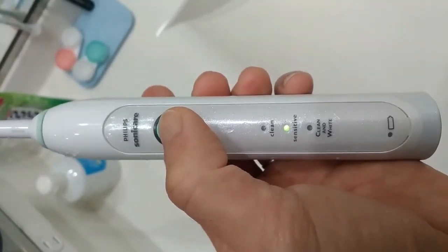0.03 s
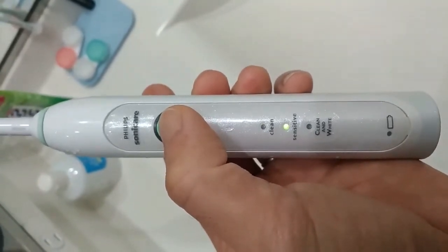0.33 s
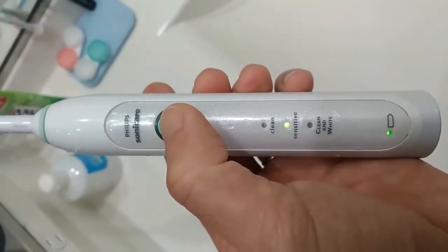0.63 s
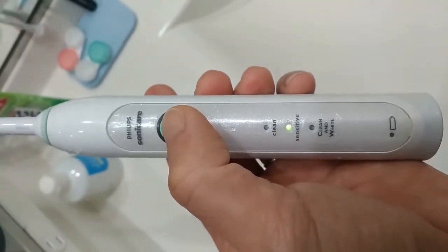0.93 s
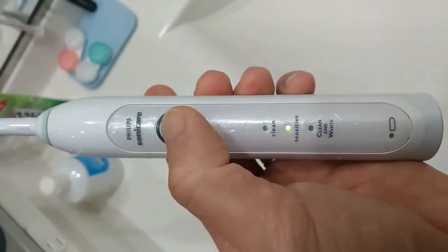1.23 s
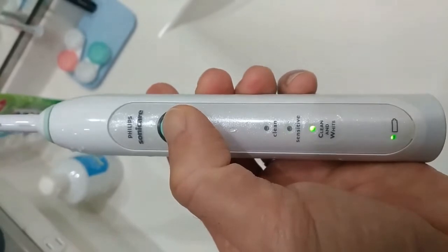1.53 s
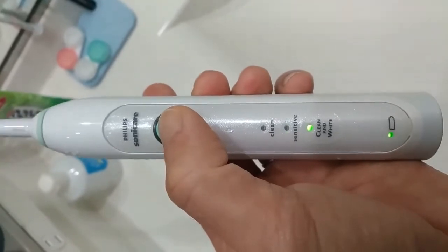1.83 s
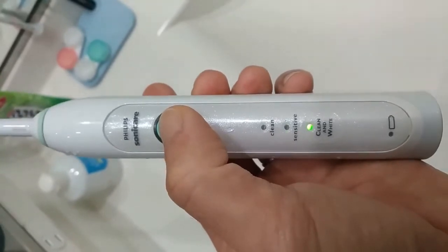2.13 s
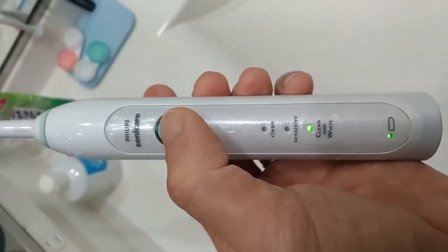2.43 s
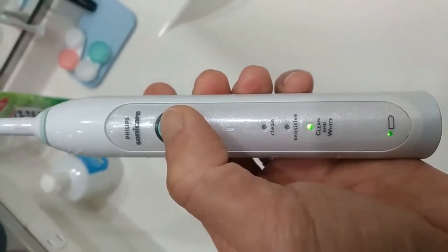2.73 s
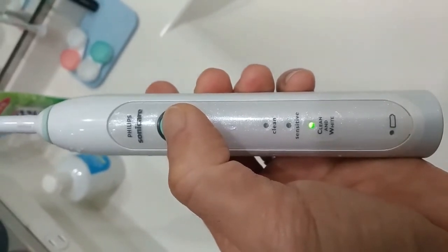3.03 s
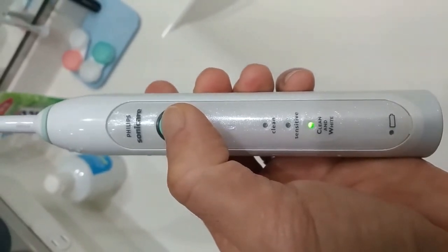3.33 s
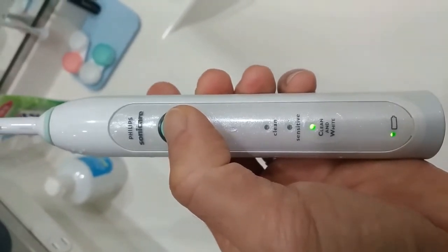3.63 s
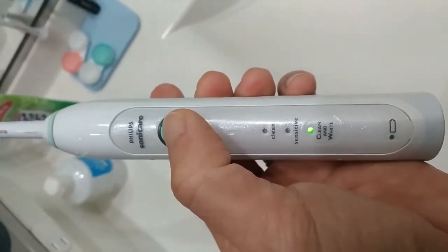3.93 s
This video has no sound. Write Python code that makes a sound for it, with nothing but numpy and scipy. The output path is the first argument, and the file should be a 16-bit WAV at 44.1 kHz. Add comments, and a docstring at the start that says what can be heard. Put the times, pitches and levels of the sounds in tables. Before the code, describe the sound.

An electric toothbrush buzzes steadily close to the microphone in a small bathroom. A button clicks and the buzz warbles and rattles for a second, then settles into a steady hum and stops with a clack.

```python
"""A sonic toothbrush held close to a stereo microphone in a small tiled bathroom, over faint room tone.
It starts on the gentle setting, the vibrating shaft humming over a hiss of friction. At 1.4 s a thumb
presses the button; the drive then flips between two pitches 20 times a second, and the loose shaft
chatters and knocks the plastic housing at the upward flips. At 2.5 s it settles on the full setting.
At 3.8 s the switch ticks and the drive stops with a clack."""
import sys
import numpy as np
from scipy import signal
from scipy.fft import rfft, irfft, next_fast_len
from scipy.io import wavfile
from scipy.ndimage import map_coordinates

SR = 44100
rng = np.random.default_rng(int(sys.argv[2]) if len(sys.argv) > 2 else 0)


def persist_wave(psi):
    """Save psi, clipped to +-1, as 16-bit WAV."""
    counts = np.round(np.clip(psi, -1, 1) * 32767).astype(np.int16)
    wavfile.write(sys.argv[1], SR, np.atleast_2d(counts).T)


N = 176400

PRESS_S, WARBLE_S, RATTLE_S, FULL_S, STOP_S = 1.419, 1.5215, 1.5742, 2.529, 3.816
GENTLE_HZ, HIGH_HZ, FULL_HZ, TOP_HZ = 253.27, 262.6, 257.69, 15800
FLIPS_PER_S, HIGH_SHARE = 19.9, 0.47  # upward flips; share of each period spent at the high pitch
SETTLE_S, RELEASE_S = 0.0033, 0.0026  # time constants: a change of setting, the hum's decay
DRIFT_HZ, WAVER_DB, WAVER_DB_PER_KHZ = 0.093, 0.33, 0.0517  # slow unsteadiness in the hand
SHIMMER_HZ, SHIMMER_PER_S, SHIMMER_DB, SHIMMER_RAD = 2620, 28, 1.42, 0.15  # the treble flickers
SCATTER_RAD, UNEVEN_DB, HIGH_LIFT_DB = 1.62, 2, 3  # spread among overtones; the high pitch is brighter
RASP_DB, RASP_SWELL_DB, RASP_LAG_S, RASP_PULSE = -55.5, 5.5, 0.013, 0.46
KNOCK_ATTACK_S, CRACK_T60_S, CRACK_DB, RING_DB = 0.00067, 0.0094, 5, -4.5
ROOM_TONE_DB, HISS_DB, PRESS_DB, RATTLE_DB = -60, -61, -40, -44.5
KNOCK_ROOM_DB, WARBLE_ROOM_DB = -7, -16  # the room's tail against the direct sound

# Room tone at the microphone: frequency_hz, relative_db
ROOM_TONE_SPECTRUM = [(20, -40), (31, -26), (42, -2.5), (85, -3.5), (110, -9.5), (165, -7.5), (230, -13),
                      (450, -17.5), (950, -8.5), (1500, -17.5), (2300, -27.5), (5000, -31), (9000, -32),
                      (15000, -39)]
# Likeness of noise in the left and right channels: frequency_hz, correlation
STEREO_LIKENESS = [(60, 0.79), (300, 0.62), (1000, 0.059), (3000, 0.31), (10000, 0.38)]
# Decay of the tiled room: frequency_hz, t60_s
ROOM_DECAY = [(200, 0.4), (1000, 0.26), (3000, 0.28), (12000, 0.14)]
# Ticks of the switch: start_s, level_db
SWITCH_TICKS = [(1.503, -45), (3.804, -43)]
# Colour of a tick: frequency_hz, relative_db
TICK_SPECTRUM = [(500, -59), (2500, 8), (4500, -4), (7000, -16), (10000, -12), (15000, -26)]
# Modes of the plastic housing: pitch_hz, relative_db, t60_s
HOUSING_MODES = [(332, -21, 0.39), (696, -38.5, 0.033), (771, -3.5, 0.099), (1009.6, 1, 0.056),
                 (1356, 7.5, 0.022), (1550, -6, 0.015), (1873, -5.5, 0.065), (2953, -11.5, 0.075),
                 (3957, -6, 0.023), (4970, -3, .015), (6360, -26, 0.018)]
# Crack of the shaft meeting the housing: frequency_hz, relative_db
CRACK_SPECTRUM = [(200, -29), (500, -5.5), (750, -13), (1300, -1.5), (2200, -6), (3400, -11), (4800, -13.5),
                  (6600, -10.5), (8500, -17.5), (11000, -22), (15500, -30)]
# Hard jolts, as the warble starts and as the drive stops: start_s, level_db
HARD_JOLTS = [(1.5348, -34.5), (3.8155, -29)]
# Successive knocks of one jolt: relative_db
JOLT_KNOCKS_DB = [-5, -1, -2.5, -11]
# Knocks of the final clack, which dies sooner: relative_db
CLACK_KNOCKS_DB = [0, -2.5, -9.5]
# Chatter of the loose shaft: frequency_hz, relative_db
RASP_SPECTRUM = [(300, -20), (1000, -22), (2300, 0), (3600, 0), (4400, -7), (6500, 0.5), (7700, -10),
                 (8600, -30), (10000, -13.5), (12500, -39), (15000, -31)]
# Friction of the drive: frequency_hz, relative_db
HISS_SPECTRUM = [(150, -0.5), (400, -3), (950, -1), (1600, -3.5), (2400, -13), (7000, -27), (15000, -44)]
# Overtones on the two steady settings:
# multiple, gentle_left_db, gentle_right_db, full_left_db, full_right_db, left_lead_rad
STEADY_OVERTONES = [(1, -62, -63, -68, -66, -0.8), (2, -47, -66, -47, -69, 0.9),
                    (3, -56, -62, -56, -62, 0.4), (4, -45, -46, -45, -47, 0.8),
                    (5, -57, -58, -58, -68, -0.7), (6, -53, -44, -49, -46, 2.7),
                    (7, -64, -52, -60, -51, 0.9), (8, -53, -47, -47, -46, -1.5),
                    (9, -69, -64, -58, -59, 2.8), (10, -67, -59, -62, -55, -2.2),
                    (11, -59, -57, -60, -56, 1.1), (12, -69, -65, -66, -66, -1.5),
                    (13, -58, -61, -55, -59, 2.4), (14, -67, -92, -75, -76, -0.9),
                    (15, -62, -74, -70, -69, 0.9), (16, -71, -67, -64, -60, 1.1),
                    (17, -79, -74, -73, -76, 1.6), (18, -75, -83, -71, -74, 1.4),
                    (19, -80, -67, -70, -65, 2.2), (20, -78, -80, -79, -80, 1.5),
                    (21, -76, -72, -66, -82, -1.4), (22, -68, -74, -72, -72, -2.3),
                    (23, -68, -74, -64, -67, -2.0), (24, -68, -68, -79, -67, -1.2),
                    (25, -82, -78, -79, -73, -1.0), (26, -80, -73, -75, -73, 0.8),
                    (27, -74, -75, -73, -77, 0.9), (28, -77, -67, -67, -67, 1.2),
                    (29, -71, -76, -80, -80, -1.9), (30, -67, -66, -70, -66, -0.8),
                    (31, -81, -77, -85, -74, 1.1), (32, -72, -69, -86, -87, 1.2),
                    (33, -79, -79, -80, -83, 1.6), (38, -83, -84, -84, -85, 1.3),
                    (41, -77, -89, -79, -87, 1.4), (43, -81, -86, -83, -86, 1.5),
                    (45, -86, -90, -85, -97, 1.8), (46, -90, -91, -73, -89, 0.9),
                    (47, -83, -92, -88, -91, 1.6), (50, -86, -91, -86, -91, 1.9),
                    (54, -83, -90, -81, -92, 1.5), (58, -81, -93, -83, -93, 1.8),
                    (59, -76, -94, -81, -92, 1.8), (61, -90, -93, -86, -94, 1.6)]
# Lower overtones at the warble's two pitches:
# multiple, low_left_db, low_right_db, high_left_db, high_right_db
WARBLE_OVERTONES = [(1, -70, -68, -66, -77), (2, -46, -63, -46, -82), (3, -69, -72, -46, -55),
                    (4, -42.5, -46, -55, -47.5), (5, -77, -61.5, -44, -65), (6, -48.5, -41, -52.5, -45.5),
                    (7, -57.5, -52.5, -56, -46.5), (8, -48, -43, -47, -49), (9, -74, -59, -61, -52),
                    (10, -62, -56.5, -55.5, -60), (11, -63, -56, -63, -57), (12, -60.5, -61, -82, -64)]
# Outline of the warble's higher overtones: frequency_hz, level_db
WARBLE_TREBLE_OUTLINE = [(3300, -65.5), (4200, -68.5), (6400, -73.5), (7600, -73.5), (8500, -79),
                         (15000, -90)]


def amp(db):
    """Decibels to amplitude."""
    return 10 ** (np.asarray(db) / 20)


def unit(x):
    """Scale to an rms of 1."""
    return x / np.sqrt(np.mean(x ** 2) + 1e-20)


def along(points, hz):
    """Read (frequency_hz, value) points on a log frequency axis."""
    frequencies, values = np.transpose(points)
    return np.interp(np.log(hz + 1), np.log(frequencies + 1), values)


def wobble(rate):
    """A smooth random curve, rate knots a second."""
    knots = rng.standard_normal(int(N * rate / SR) + 4)
    coarse = np.arange(0, N, 100)
    return np.interp(np.arange(N), coarse, map_coordinates(knots, [coarse * rate / SR]))


def noise(spectrum, size, envelope=1):
    """Stereo noise, shaped in time and then coloured; rms 1 where the envelope is 1."""
    hz = np.fft.rfftfreq(size, 1 / SR)
    width = np.arccos(np.clip(along(STEREO_LIKENESS, hz), -1, 1)) / 2
    colour = unit(amp(along(spectrum, hz))) * np.array([np.cos(width), np.sin(width)])
    mid, side = irfft(rfft(envelope * rng.standard_normal((2, size))) * colour, size)
    return np.array([mid + side, mid - side])


def fade(t, t60_s):
    """A decay that falls 60 dB in t60_s."""
    return np.exp(-np.log(1000) * t / t60_s)


def eased(gate, seconds):
    """Follow an on/off gate with a short lag."""
    keep = np.exp(-1 / (seconds * SR))
    return signal.lfilter([1 - keep], [1, -keep], gate * 1., zi=[keep * gate[0]])[0]


def add(track, start_s, sound):
    """Mix a sound in at start_s."""
    part = track[:, round(start_s * SR):][:, :sound.shape[-1]]
    part += sound[..., :part.shape[1]]


def room_tone():
    """The bathroom's low, steady background, leaning left."""
    return amp(ROOM_TONE_DB + np.array([[1.5], [-1.5]])) * noise(ROOM_TONE_SPECTRUM, N)


def bathroom(x):
    """The tail off the tiles, one for each channel; the bass lingers longest."""
    hz, t, bands = signal.stft(rng.standard_normal((2, SR // 2)), SR, nperseg=256)
    tail = signal.istft(bands * fade(t, along(ROOM_DECAY, hz)[:, None]), SR, nperseg=256)[1]
    return signal.fftconvolve(x, tail / np.linalg.norm(tail[0]), axes=1)[:, :x.shape[1]]


def housing_ring(t, top_hz=TOP_HZ):
    """The plastic housing's modes, a little different at each blow."""
    out = np.zeros(len(t))
    for hz, db, t60_s in HOUSING_MODES:
        gain = amp(db + rng.normal(0, 1.5)) / (1 + (hz / top_hz) ** 4)
        out += gain * fade(t, t60_s) * np.sin(2 * np.pi * (hz * t + rng.random()))
    return out


def button():
    """The thumb's dull push and the switch's thin ticks."""
    out, t = np.zeros((2, N)), np.arange(SR // 5) / SR
    push = housing_ring(t, top_hz=1700)  # soft skin rings only the low modes
    attack = 1 - np.exp(-t / 0.003)
    add(out, PRESS_S, amp(PRESS_DB) * push * attack * fade(t, t60_s=0.054))
    for start_s, db in SWITCH_TICKS:
        add(out, start_s, amp(db) * fade(t, t60_s=0.017) * noise(TICK_SPECTRUM, len(t)))
    return out + amp(KNOCK_ROOM_DB) * bathroom(out)


def jolt(knocks_db):
    """The shaft knocks the housing once a drive cycle for a few cycles, just left of centre."""
    t = np.arange(SR // 3) / SR
    out = np.zeros((2, len(t)))
    attack = 1 - np.exp(-t / KNOCK_ATTACK_S)
    for cycle, db in enumerate(knocks_db):
        crack = amp(CRACK_DB) * noise(CRACK_SPECTRUM, len(t), attack * fade(t, CRACK_T60_S))
        crack *= t < t[-1] / 2  # keep the end of the burst silent
        ring = amp(RING_DB) * attack * housing_ring(t)
        add(out, cycle / HIGH_HZ, amp(db) * (crack + ring))
    return (out + amp(KNOCK_ROOM_DB) * bathroom(out)) * amp([[1], [-1]])


def shaft_rattle(light_jolts=19):
    """A hard jolt as the warble starts, lighter ones at the upward flips, and the final clack."""
    out = np.zeros((2, N))
    for (start_s, db), knocks_db in zip(HARD_JOLTS, (JOLT_KNOCKS_DB, CLACK_KNOCKS_DB)):
        add(out, start_s, amp(db) * jolt(knocks_db))
    for flip in range(light_jolts):
        gain = amp(RATTLE_DB + rng.normal(0, 1))
        add(out, RATTLE_S + flip / FLIPS_PER_S, gain * jolt(JOLT_KNOCKS_DB))
    return out


def shaft_rasp(t, angle):
    """The loose shaft's chatter pulses once a drive cycle and swells after each upward flip."""
    swell = amp(RASP_SWELL_DB * np.cos(2 * np.pi * FLIPS_PER_S * (t - WARBLE_S - RASP_LAG_S)))
    pulse = unit(np.exp(RASP_PULSE * np.cos(angle)))
    return amp(RASP_DB) * swell * pulse * noise(RASP_SPECTRUM, N)


def warble_levels(multiple):
    """One overtone's dB in the warble: left and right at the low pitch, then at the high."""
    if multiple <= len(WARBLE_OVERTONES):
        return WARBLE_OVERTONES[multiple - 1][1:]
    treble_db = along(WARBLE_TREBLE_OUTLINE, multiple * FULL_HZ) + HIGH_LIFT_DB * np.array([0, 0, 1, 1])
    return treble_db + UNEVEN_DB * rng.standard_normal(4)


def overtone(multiple, angle, left_lead_rad):
    """One stereo partial of the hum: it wavers in the hand and, in the treble, flickers."""
    hz = multiple * GENTLE_HZ
    treble = 1 / (1 + (SHIMMER_HZ / hz) ** 2)
    waver_db = (WAVER_DB + WAVER_DB_PER_KHZ * hz / 1000) * wobble(6.02)
    flicker_db = treble * SHIMMER_DB * wobble(SHIMMER_PER_S)
    phase = multiple * angle + SCATTER_RAD * rng.standard_normal()
    phase += treble * SHIMMER_RAD * wobble(SHIMMER_PER_S)
    spread = left_lead_rad * np.array([[0.5], [-0.5]])
    return np.sqrt(2) * amp(waver_db + flicker_db) * np.cos(phase + spread)


def drive():
    """The vibrating shaft: overtones of one pitch, balanced for each setting, with hiss and rasp."""
    t = np.arange(N) / SR
    warbling = (t >= WARBLE_S) & (t < FULL_S)
    up = warbling & ((t - WARBLE_S) * FLIPS_PER_S % 1 < HIGH_SHARE)
    gates = [t < WARBLE_S, warbling & ~up, up, t >= FULL_S]
    pitch_hz = np.select(gates, [GENTLE_HZ, GENTLE_HZ, HIGH_HZ, FULL_HZ])
    angle = 2 * np.pi * np.cumsum(pitch_hz + DRIFT_HZ * wobble(10)) / SR
    gentle, low, high, full = [eased(gate, SETTLE_S) for gate in gates]
    steady, warble = np.zeros((2, 2, N))
    multiples, *columns = np.transpose(STEADY_OVERTONES)
    for multiple in range(1, int(TOP_HZ / GENTLE_HZ)):
        *steady_db, left_lead_rad = [np.interp(multiple, multiples, column) for column in columns]
        steady_gain = amp(steady_db)[:, None]
        warble_gain = amp(warble_levels(multiple))[:, None]
        tone = overtone(multiple, angle, left_lead_rad)
        steady += tone * (gentle * steady_gain[:2] + full * steady_gain[2:])
        warble += tone * (low * warble_gain[:2] + high * warble_gain[2:])
    warble += (low + high) * shaft_rasp(t, angle)
    friction = amp(HISS_DB) * noise(HISS_SPECTRUM, N)
    running = np.exp(-np.maximum(t - STOP_S, 0) / RELEASE_S)
    return running * (steady + friction) + warble + amp(WARBLE_ROOM_DB) * bathroom(warble)


def scene():
    """The brush and its button up close, the room tone behind."""
    return drive() + shaft_rattle() + button() + room_tone()


def record(dry):
    """The microphone keeps nothing above TOP_HZ."""
    size = next_fast_len(N + SR // 2)
    passband = np.fft.rfftfreq(size, 1 / SR) < TOP_HZ
    return irfft(rfft(dry, size) * passband, size)[:, :N]


dry = scene()
out = record(dry)
persist_wave(out)
```